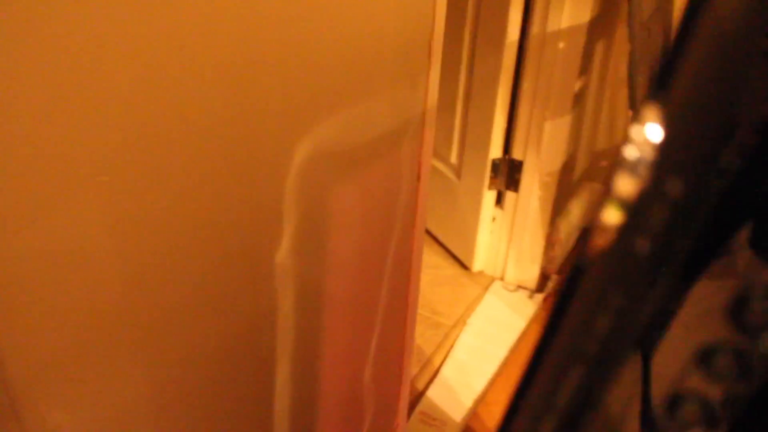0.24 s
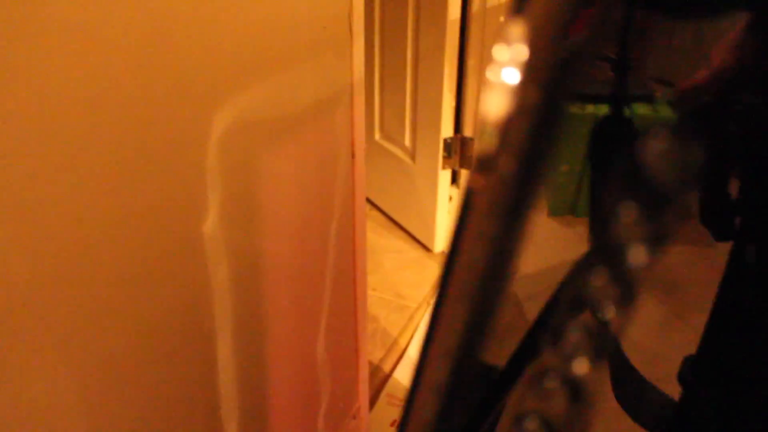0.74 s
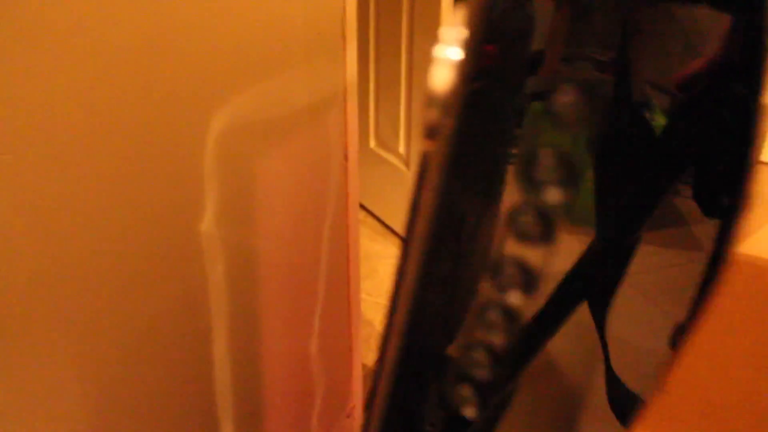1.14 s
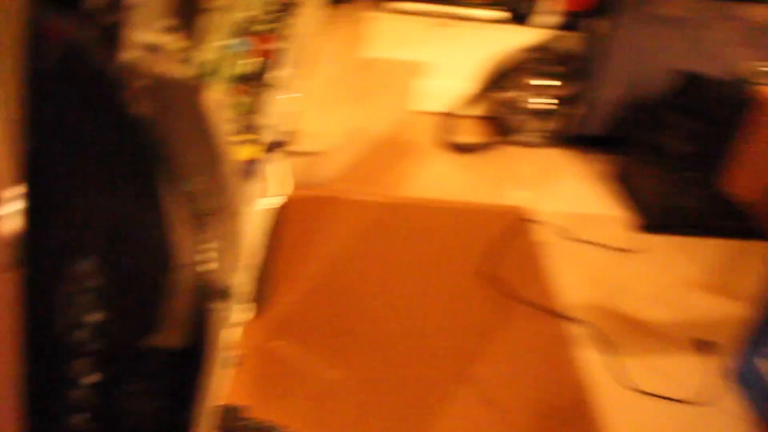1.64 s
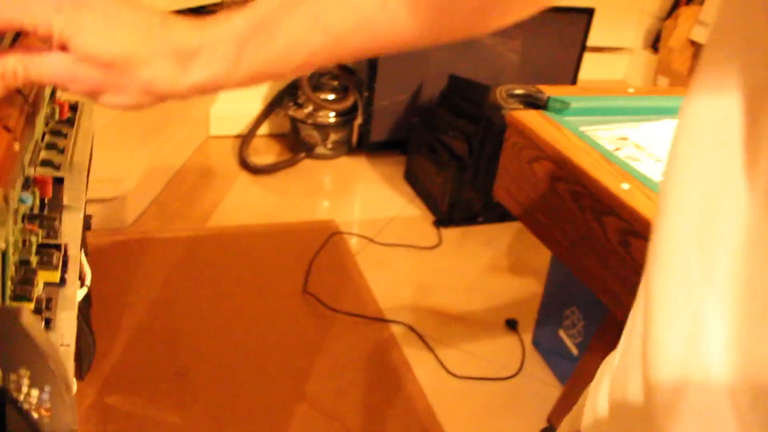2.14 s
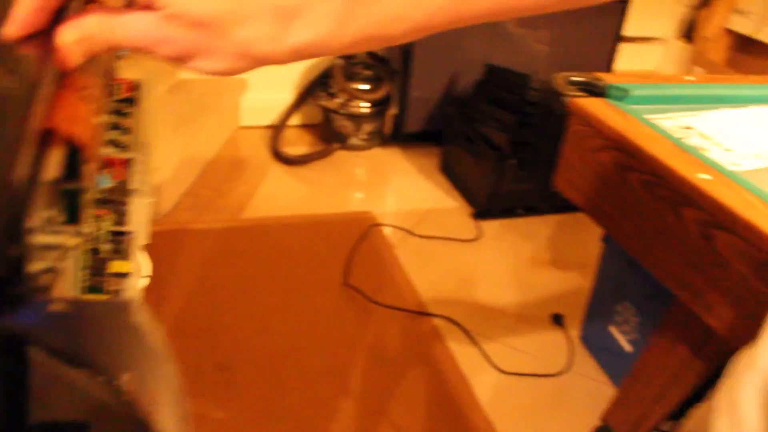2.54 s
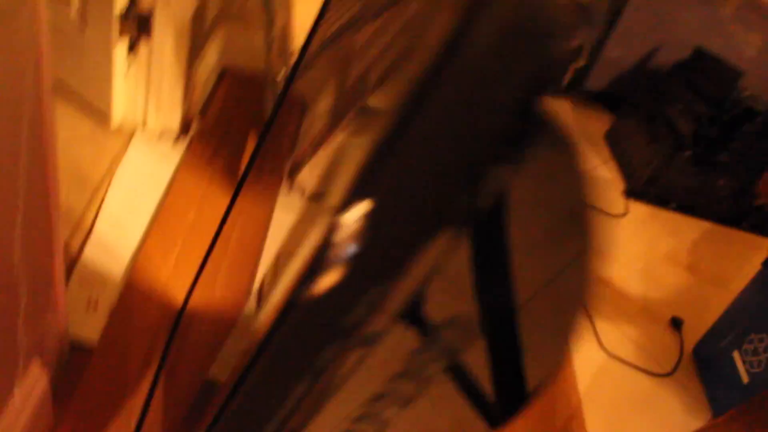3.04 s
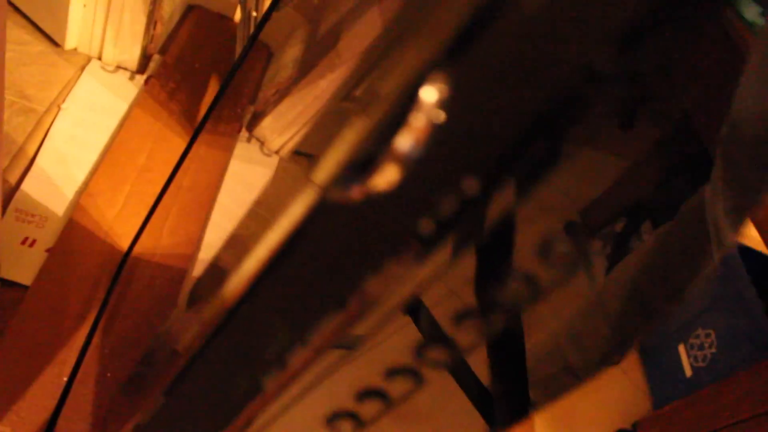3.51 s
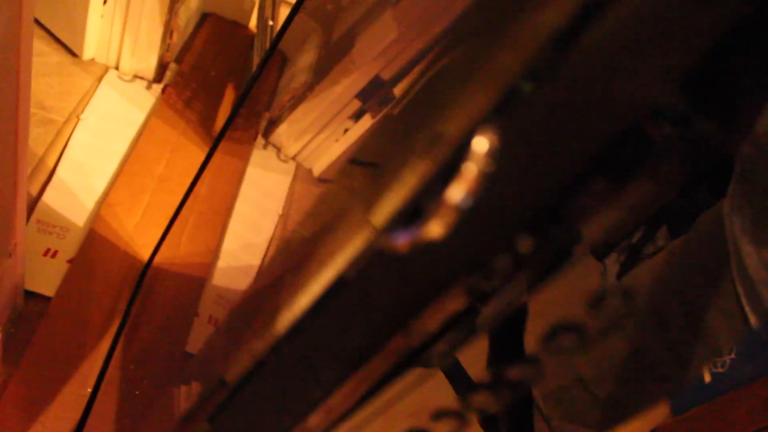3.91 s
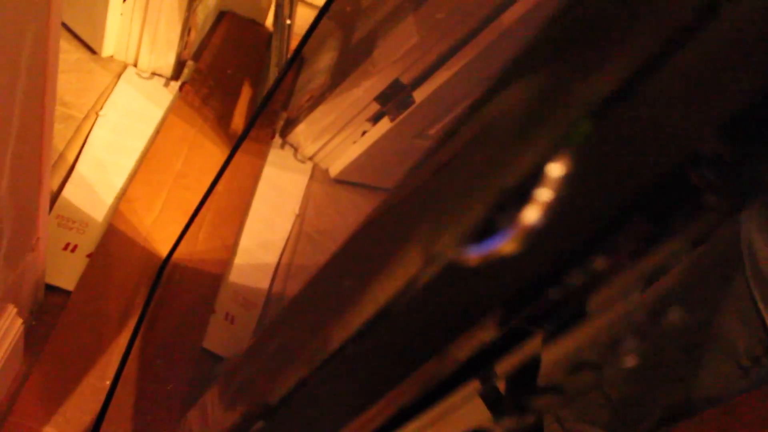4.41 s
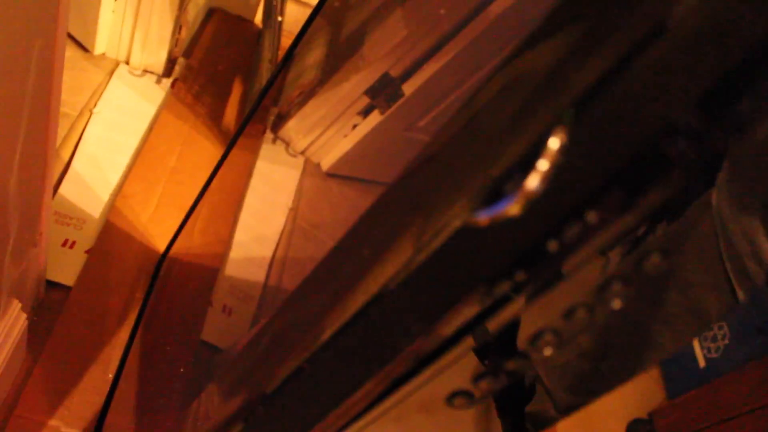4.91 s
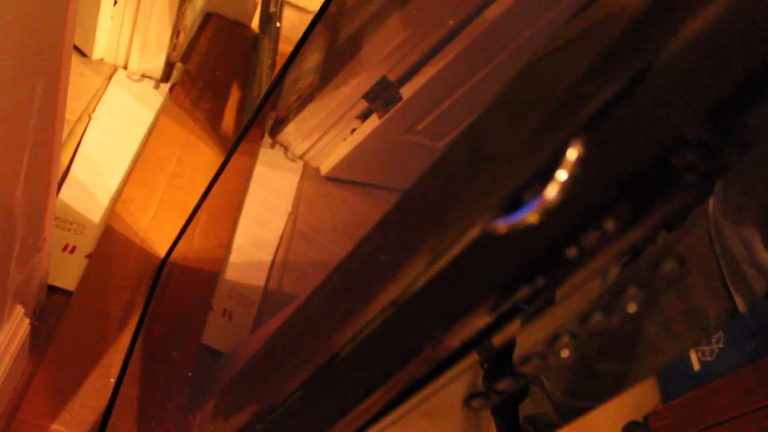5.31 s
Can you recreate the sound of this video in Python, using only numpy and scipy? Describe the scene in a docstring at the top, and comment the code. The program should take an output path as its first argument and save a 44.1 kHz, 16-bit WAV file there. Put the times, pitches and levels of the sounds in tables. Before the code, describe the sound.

A bang dies away with a brief rattle of loose parts. Relays then click unevenly inside an opened electronic device as it powers up, each click ringing briefly in its metal frame. Two small metallic pings follow, and the clicks grow sparser. Close to the microphone, a hand makes dull knocks, soft thumps, rubbing and a brief low rumble, over the faint hiss of a quiet room.

```python
"""Relays click unevenly inside an opened electronic device as it powers up, and its metal frame rings.
Two small metal parts ping, and at the start a bang dies away, rattling loose parts.
Someone holds a camera beside the device: close to the microphone, the hand makes short dull knocks,
soft thumps, rubbing and a low rumble. Behind it all is the faint hiss of a quiet room."""
import sys
import numpy as np
from scipy import signal
from scipy.fft import rfft, irfft
from scipy.io import wavfile
from scipy.ndimage import uniform_filter1d

SR = 44100
rng = np.random.default_rng(int(sys.argv[2]) if len(sys.argv) > 2 else 0)


def dump_mix(stems):
    """Bounce the given channels to the path in sys.argv[1] as a 16-bit WAV at rate SR."""
    frames = np.atleast_2d(stems).T  # one column per channel
    limited = np.clip(frames, -1, 1)  # hard clip at full scale
    pcm = np.round(limited * 32767).astype(np.int16)
    wavfile.write(sys.argv[1], SR, pcm)


N = 244975
TIME = np.arange(N) / SR
T = TIME[:2 ** 15]  # seconds since a hit
HZ = np.fft.rfftfreq(len(T), 1 / SR)

# The relay clicks. Each row: start in seconds, level in dB, extra bass, treble and ring in dB,
# a favoured pitch in Hz, its boost in dB.
CLICKS = [(0.2342, -39.5, -2, 8, -1.5, 1610, 9.5), (0.295, -50.5, 1, -0.5, 2, 7000, 4),
          (0.5037, -35.5, -4, -5, 4.5, 800, -1), (0.522, -32, -4, -8, -7, 2000, 8),
          (0.5749, -38, -2, 10, -1.5, 1700, 7), (0.6454, -35, -4.5, 1, 1, 2100, 5.5),
          (.848, -36, 0, -8, 3, 1300, 4.5), (1.0256, -35, 5.5, -17, 2, 380, 1),
          (1.038, -40, -3, -12, 8, 1150, -1), (1.144, -46.5, 1, -8, 2, 1900, 6),
          (1.173, -41.5, 6.5, -34, -10, 704, 13.5), (1.8151, -39.5, -9, 4.5, -1, 2600, 2.5),
          (2.21, -46.5, 5.5, -47, -5, 1240, 8), (2.701, -38, 0.5, 1.5, 3.5, 695, 0.5),
          (2.852, -57, 1.5, -13, 8.5, 183, 8.5), (3.148, -49.5, -3, -3, -8, 6000, 8),
          (3.2046, -37.5, 0.5, 3, 4, 3340, 4.5), (3.4142, -39, 0, -10, 0.5, 1060, 2.5),
          (3.4714, -36.3, 4, -4.5, -1.5, 720, 4), (4.9537, -37, 0.5, 4.5, 2.5, 1000, 0.5)]
# The tone of a click. Each row: frequency in Hz, level in dB.
CLICK_TONE = [(40, -18.5), (90, -6), (150, 4), (210, 4.5), (290, -1.5), (450, -1.5), (700, 1.5),
              (1050, 1.5), (1400, -4), (2200, 1), (3800, -3), (5500, -9.5), (8000, -10.5), (11000, -17),
              (16000, -16.5)]
# How long the frame rings. Each row: frequency in Hz, fade time (seconds to fall by 60 dB).
RING_FADE = [(150, 0.46), (700, 0.1939), (1800, 0.44), (3800, 0.33), (6000, 0.6), (10000, 0), (16000, 0.74)]
# How the ring's tone differs from the click's. Each row: frequency in Hz, change in dB.
RING_TONE = [(100, -3.5), (250, -4.5), (700, -1.5), (1300, -8.5), (2200, -9.5), (4200, -2.5), (6000, -9.5),
             (9000, -3), (16000, -10)]
# The frame's own notes. Each row: pitch in Hz, relative level in dB, fade time in seconds.
FRAME_NOTES = [(140.6, -13.5, 0.14), (192.6, -4.5, 0.077), (205.9, -12, 0.24), (326.3, -18.5, 0.34),
               (400, -17, 0.17), (464, -12, 0.13), (700.4, -11.5, 0.22), (1012, -10.5, 0.15),
               (1365, -19, 0.22), (1792, -18.5, 0.41), (2150, -21, .3), (2640, -22, .35), (3300, -29, 0.46),
               (3510, -19.5, 0.39), (3850, -14, 0.18), (4210, -20.5, 0.33), (4440, -15.5, 0.14)]

def relays(chatter_s=0.0087, snap=0.72, snap_s=0.0013, bounce_s=0.0041, bounce=0.52, notes_db=-4):
    """Each relay snaps shut, its contacts chatter and bounce, and the frame rings on."""
    out = np.zeros(N)
    envelope = np.exp(-T / chatter_s) + snap * np.exp(-T / snap_s)
    envelope += bounce * (T > bounce_s) * np.exp(-abs(T - bounce_s) / 0.0014)
    swell = 1 - np.exp(-T / 0.001)  # the ring takes a moment to spread
    notes = np.array([amp(db) * dying_note(hz, fade_s) for hz, db, fade_s in FRAME_NOTES])
    for s, db, bass_db, treble_db, ring_db, hz, boost_db in CLICKS:
        accent = bass_and_treble(bass_db, treble_db, bass_hz=844, treble_hz=3730)
        accent += boost_db * hump(hz, 0.29 * hz)
        tone = read(CLICK_TONE, HZ) + accent
        crack = tint(burst(envelope, smooth_bins=600), tone)
        ring = dying_noise(RING_FADE) * swell
        ring = tint(ring / np.linalg.norm(ring), tone + read(RING_TONE, HZ))
        # each click wakes the notes differently
        shares = rng.choice([-1, 1], len(notes)) * amp(rng.uniform(-3.5, 2.6, len(notes)))
        frame = ring / strength(crack) + amp(notes_db) * tint(shares @ notes, accent)
        add(out, s, amp(db) * (crack / strength(crack) + amp(ring_db) * frame))
    return out

# Groups of close notes in two metal parts. Each row: pitch in Hz, width in Hz, level in dB,
# fade time in seconds.
FIRST_PING = [(1326, 80, -49, 0.36), (1784, 64, -51, 0.26), (3150, 930, -50, 0.35), (4780, 360, -48, 0.27),
              (5660, 690, -51.5, 0.39), (7200, 120, -51, .26), (7600, 700, -55, 0.38),
              (10550, 810, -51.5, 0.28), (11000, 7000, -51.5, 0.26)]
SECOND_PING = [(1350, 180, -47.5, 0.29), (1950, 480, -50.5, 0.44), (2780, 200, -57, .25),
               (3860, 180, -44.5, 0.44), (4900, 1100, -43.5, 0.3), (5500, 410, -43, 0.36),
               (6000, 220, -44, 0.18), (6540, 360, -44, 0.23), (9100, 4500, -49, 0.31)]
# The pings. Each row: start in seconds, level of the strike in dB, the part's notes.
PINGS = [(1.6255, -46.5, FIRST_PING), (1.9373, -40.5, SECOND_PING)]

def pings():
    """A bright strike rings a metal part; its close notes waver against each other."""
    out = np.zeros(N)
    tone = read([(300, -28), (1500, -14), (3000, 6), (6000, 15), (15000, 7)], HZ)
    for s, strike_db, groups in PINGS:
        strike = tint(burst(np.exp(-T / 0.0042), smooth_bins=600), tone)
        add(out, s, amp(strike_db) * strike / strength(strike))
        for hz, width, db, fade_s in groups:
            notes = irfft(rfft(rng.standard_normal(len(T))) * hump(hz, width))
            decay = amp(-60 * T / fade_s)
            add(out, s, amp(db) * unit(notes * decay) * np.sqrt(np.mean(decay ** 2)))
    return out

# The tone of the bang. Each row: frequency in Hz, relative level in dB.
BANG_TONE = [(30, -34), (80, -19), (180, -15), (260, -15.5), (330, -4), (520, 0), (750, 2), (900, 0),
             (1150, -1.5), (1600, -3.5), (2400, -9.5), (4000, -19), (7000, -30), (15000, -52)]
# How long it lasts. Each row: frequency in Hz, fade time in seconds.
BANG_FADE = [(100, 0.97), (400, .72), (800, .6), (1600, 0.66), (4000, 0.7), (12000, 1)]
# Panel notes that stand out of it. Each row: pitch in Hz, width in Hz, boost in dB.
PANEL_NOTES = [(301, 13, 7), (450, 15, 6.5), (530, 20, 5), (716, 22, 8), (983, 17, 5), (1155, 18, 9.5),
               (1616, 16, 6), (2040, 40, 4)]

def bang(start_db=-27):
    """A bang dies away as a wash of noise, coloured by the ringing panels."""
    tone = read(BANG_TONE, HZ) + sum(db * hump(hz, width) for hz, width, db in PANEL_NOTES)
    wash = irfft(amp(tone) * np.exp(2j * np.pi * rng.random(len(HZ))))
    tail = fade(wash, BANG_FADE)
    out = np.zeros(N)
    add(out, 0, amp(start_db) * tail / np.std(tail[:SR // 20]))
    return out

# Ticks of loose parts. Each row: start in seconds, level in dB, pitch in Hz.
TICKS = [(.003, -31, 1470), (0.02, -42, 2400), (.050, -37, 900), (.072, -53, 1600), (0.111, -51, 4500),
         (0.12, -56, 6000)]

def rattles(decay_s=.005):
    """Loose parts shaken by the bang tick against each other."""
    out = np.zeros(N)
    for s, db, hz in TICKS:
        tone = read([(.2, -23), (1, 9), (2, -6), (8, -39)], HZ / hz)
        tick = tint(burst(np.exp(-T / decay_s), smooth_bins=600), tone)
        add(out, s, amp(db) * tick / strength(tick))
    return out

# Dull knocks. Each row: start in seconds, level in dB, pitch in Hz, extra bass and treble in dB.
KNOCKS = [(0.3974, -33.5, 1220, 3, -9), (0.5133, -28, 1090, 5, -9), (0.5255, -29, 1750, 3, 7),
          (0.561, -34.5, 1490, 10, -4), (0.601, -40.5, 1180, -10, -3), (0.761, -30.5, 1100, 6.5, -8),
          (1.0275, -41.5, 590, 2, -8), (1.03, -35.5, 1200, -2, -1), (1.0400, -34, 1140, 0, -14),
          (1.0805, -34.5, 1130, 1, 6), (1.156, -48, 1100, 14, -20), (1.448, -43, 1430, -35, -26),
          (1.575, -48.3, 400, 12, -18), (1.6197, -49.5, 1570, -22, -17), (1.624, -43.5, 420, 2, -24),
          (1.890, -40, 1530, 3, -5), (3.1046, -37, 1480, -6, 4.5)]
# The tone of a knock. Each row: multiple of its pitch, relative level in dB.
KNOCK_TONE = [(.04, -31), (.12, -8.5), (.25, -16), (.5, -5.5), (.75, -4), (1, 4), (1.35, -3), (1.8, -10),
              (2.6, -9.5), (3.7, -20), (7, -36.5), (14, -56)]
# The plastic shell's own tone. Each row: pitch in Hz, width in Hz, boost or cut in dB.
SHELL_TONE = [(715, 120, 4.5), (2130, 300, 2.5), (2350, 200, 0.5), (2920, 340, 2), (4030, 230, 1.5),
              (4530, 1100, -4.5), (5700, 440, 4.5)]

def knocks(push_cycles=.9, rattle=0.25, rattle_s=0.0063, echo_db=-14):
    """A short push on plastic close to the microphone, with a brief rattle and a little room echo."""
    out = np.zeros(N)
    shell = sum(db * hump(hz, width) for hz, width, db in SHELL_TONE)
    for s, db, hz, bass_db, treble_db in KNOCKS:
        push_s = push_cycles / hz  # a softer push is longer and lower
        push = T / push_s * np.exp(1 - T / push_s)
        hit = burst(push + rattle * np.exp(-T / rattle_s), smooth_bins=560)
        echo = dying_noise([(200, 0.37), (1500, 0.16), (8000, 0.053)])
        tone = read(KNOCK_TONE, HZ / hz) + shell
        tone += bass_and_treble(bass_db, treble_db, bass_hz=546, treble_hz=3300)
        knock = tint(hit + amp(echo_db) * echo / np.linalg.norm(echo), tone)
        add(out, s, amp(db) * knock / strength(knock))
    return out

# Soft thumps. Each row: start in seconds, pitch in Hz, level in dB, fade time in seconds.
THUMPS = [(1.026, 190, -27.5, 0.052), (1.0266, 100, -36, .09), (1.6, 125, -47, .06), (1.897, 60, -46, .05),
          (1.976, 120, -41, 0.06), (2.058, 72, -40, 0.08), (2.102, 120, -38.5, 0.045)]

def thumps(rise_s=0.0021):
    """Each bump of the hand shakes the camera back and forth a few times."""
    out = np.zeros(N)
    for s, hz, db, fade_s in THUMPS:
        add(out, s, amp(db) * dying_note(hz, fade_s) * (1 - np.exp(-T / rise_s)))
    return out

# The camera's swing: start and end in seconds, starting level in dB.
SWING = (1.6, 2.2, -59.5)
# The tone of its rumble. Each row: frequency in Hz, relative level in dB.
RUMBLE_TONE = [(15, -6), (30, -2.5), (50, -4), (85, -5), (130, -13.5), (220, -22), (500, -42)]

def rumble(growth_db_per_s=7):
    """A low rumble grows while the camera swings round."""
    start, end, db = SWING
    growth_db = growth_db_per_s * (np.clip(TIME, start, end) - start)
    return noise(RUMBLE_TONE) * movement(start, end, db + growth_db)

# Faint rubbing while the camera is carried: start and end in seconds, level in dB.
CARRY = (.55, 1.91, -64)
# Slides of the hand. Each row: loudest moment in seconds, level in dB, fade time in seconds.
SLIDES = [(.54, -41, .4), (0.694, -44, .22), (.748, -49, .4), (.98, -57, .2), (1.06, -51.5, 0.94),
          (2.255, -57.5, .3), (2.54, -60.5, 1.1), (2.89, -62, 0.1), (3.18, -60, .2), (3.40, -56, 0.24),
          (3.71, -63.5, 0.8)]
# The tone of the rubbing. Each row: frequency in Hz, relative level in dB.
RUB_TONE = [(50, -22), (170, 1), (450, 2), (1200, -5), (2500, -9), (4500, -18.5), (9000, -26.5),
            (16000, -32)]

def rubbing(roughness_db=3, rise_s=0.015):
    """The hand rubs unevenly on the camera, in slides that swell and die away."""
    grip = amp(roughness_db * unit(uniform_filter1d(rng.standard_normal(N), size=350)))
    power = movement(*CARRY) ** 2
    for s, db, fade_s in SLIDES:
        rise = np.exp(np.minimum(TIME - s, 0) / rise_s)
        fall = amp(db - 60 * np.maximum(TIME - s, 0) / fade_s)
        power += (rise * fall) ** 2
    return unit(noise(RUB_TONE) * grip) * np.sqrt(power)

# The tone of the quiet room. Each row: frequency in Hz, relative level in dB.
ROOM_TONE = [(20, -15), (35, -14), (60, -6.5), (110, -10.5), (200, -5.5), (270, -7.5), (340, -8),
             (420, -12), (700, -12.5), (1250, -13.5), (2000, -15), (4100, -17), (8000, -21), (15800, -23)]

def room_air(db=-59):
    """Room air and microphone hiss make a faint, steady background."""
    return amp(db) * noise(ROOM_TONE)

def movement(start, end, db, rise_s=.02, settle_s=.035):
    """The loudness of one camera movement: it rises, holds and settles."""
    return amp(db) * np.exp(np.minimum(TIME - start, 0) / rise_s - np.maximum(TIME - end, 0) / settle_s)

def amp(db):
    """Turns decibels into a multiplier."""
    return 10 ** (np.asarray(db) / 20)

def unit(x):
    """Scales a sound to an average (rms) level of 1."""
    return x / np.sqrt(np.mean(x ** 2) + 1e-20)

def strength(x):
    """The level of a hit if all its energy fell within 12 ms."""
    return np.sqrt(np.sum(x ** 2) / (.012 * SR))

def read(points, hz):
    """Reads between a table's rows, giving each octave equal room."""
    f, value = np.transpose(points)
    return np.interp(np.log(hz + 1e-6), np.log(f), value)

def add(mix, s, sound):
    """Mixes a sound in at s seconds."""
    part = mix[round(s * SR):][:len(sound)]
    part += sound[:len(part)]

def hump(hz, width):
    """A peak of height 1 around one pitch."""
    return 1 / (1 + ((HZ - hz) / (0.68 * width)) ** 2)

def bass_and_treble(bass_db, treble_db, bass_hz, treble_hz):
    """A curve in dB that turns the low and high ends up or down."""
    return bass_db / (1 + (HZ / bass_hz) ** 4) + treble_db / (1 + (treble_hz / (HZ + 1)) ** 4)

def tint(x, db):
    """Changes a sound's tone but keeps its start sharp (a minimum-phase filter)."""
    cepstrum = irfft(np.log(amp(np.maximum(db, -100))))
    cepstrum[1:len(T) // 2] *= 2
    cepstrum[len(T) // 2 + 1:] = 0
    return irfft(rfft(x) * np.exp(rfft(cepstrum)))

def noise(tone):
    """Steady noise of level 1 with the given tone."""
    gains = amp(read(tone, np.fft.rfftfreq(N, 1 / SR)))
    return unit(irfft(rfft(rng.standard_normal(N)) * gains, N))

def burst(envelope, smooth_bins):
    """A puff of noise, evened out so that low and high are about equally strong."""
    x = rng.standard_normal(len(T)) * envelope
    power = uniform_filter1d(abs(rfft(x)) ** 2, smooth_bins)
    return tint(x, -10 * np.log10(abs(power) + 1e-12))

def fade(x, fade_times):
    """Lets each frequency die at its own speed."""
    hz, t, bands = signal.stft(x, SR, nperseg=256)
    decay = amp(-60 * t / read(fade_times, hz)[:, None])
    return signal.istft(bands * decay, SR, nperseg=256)[1][:len(T)]

def dying_noise(fade_times):
    """Countless notes ringing out together."""
    return fade(rng.standard_normal(len(T)), fade_times)

def dying_note(hz, fade_s):
    """One pure note ringing out."""
    return np.sin(2 * np.pi * hz * T) * amp(-60 * T / fade_s)

def scene():
    """The device and the handled camera in the quiet room, in mono."""
    device = relays() + pings() + bang() + rattles()
    camera = knocks() + thumps() + rumble() + rubbing()
    return (device + camera + room_air())[None]

def record(dry, offset=.001, top_hz=15900):
    """The converter shifts the wave slightly off centre and cuts the highest treble."""
    lowpass = signal.firwin(401, top_hz, window=("kaiser", 8), fs=SR)
    return signal.oaconvolve(dry + offset, lowpass[None], "same")

dry = scene()
out = record(dry)
dump_mix(out)
```